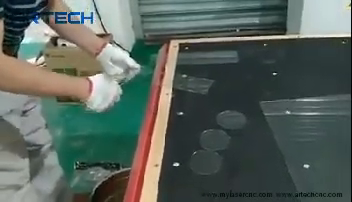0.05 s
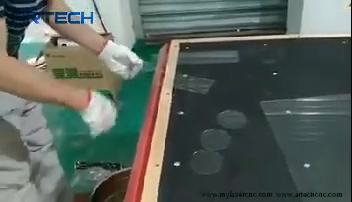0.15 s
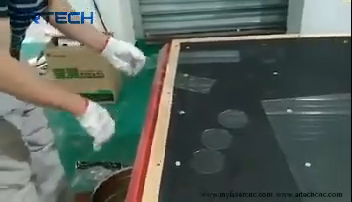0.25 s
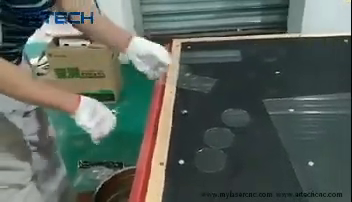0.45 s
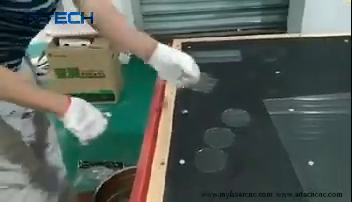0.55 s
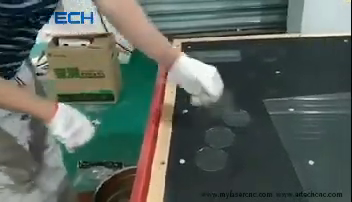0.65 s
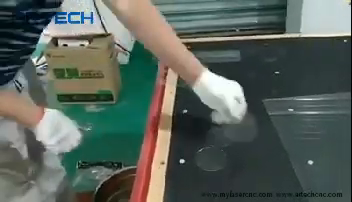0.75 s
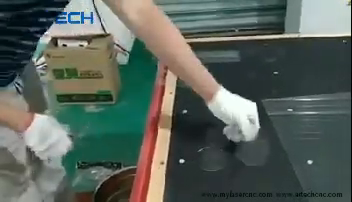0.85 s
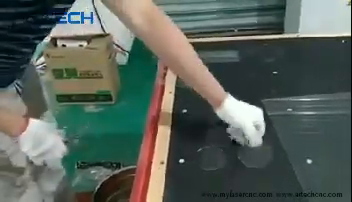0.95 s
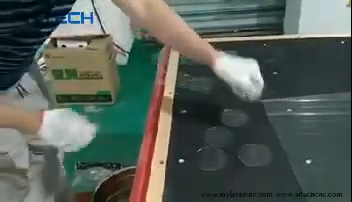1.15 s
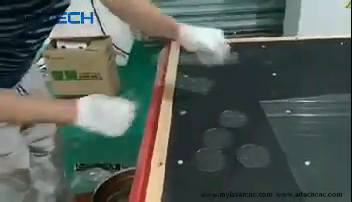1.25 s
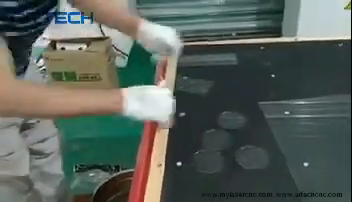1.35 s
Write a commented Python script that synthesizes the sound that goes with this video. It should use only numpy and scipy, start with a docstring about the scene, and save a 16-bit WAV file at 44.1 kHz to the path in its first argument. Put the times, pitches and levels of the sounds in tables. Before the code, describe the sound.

Glass clatter: after quiet, low machinery hum, an offcut crashes among scraps at 0.21 seconds, with bright cracks, short rings and a slight low thump, clinking until about 0.36. The hall echo swells back as the level recovers, then fades. At 0.69 a glass disc knocks on a padded table, quickly damped, with a faint tick at 0.84. Soft glove and sleeve rustle rises from 0.9.

```python
"""A glass offcut crashes among scraps in a large, echoing workshop: noise cracks, short modal rings, a bin thump.
A glass disc then knocks on the padded table and ticks once more: rim tick, table thud, modes soon stopped.
Sleeves and gloves rustle (rising noise); machinery hums far off (swelling noise, wavering sines).
The hall is a decaying noise tail. Gain control ducks at the crash and lets the ring swell back."""
import sys
import numpy as np
from scipy import signal
from scipy.fft import rfft, irfft, next_fast_len
from scipy.io import wavfile
from scipy.ndimage import minimum_filter1d

SR = 44100
rng = np.random.default_rng(int(sys.argv[2]) if len(sys.argv) > 2 else 0)


def unload_audio(sound):
    """Save the sound as a 16-bit wav file, at the path given as the first command line argument."""
    columns = np.transpose(np.atleast_2d(sound))
    # keep every value between -1 and 1, then stretch to whole-number steps
    steps = np.round(np.clip(columns, -1, 1) * 32767)
    wavfile.write(sys.argv[1], SR, steps.astype(np.int16))


N = 61739
T = np.arange(N) / SR
SIZE = next_fast_len(N, True)
FREQS = np.arange(SIZE // 2 + 1) * SR / SIZE


def from_db(db):
    """Decibels to amplitude gain."""
    return 10 ** (np.asarray(db) / 20)


def rms_one(x):
    """Scale to unit rms."""
    return x / np.sqrt(np.mean(x ** 2) + 1e-20)


def at_hz(points, hz):
    """Interpolate a (hz, value) table on a log-frequency axis."""
    point_hz, value = np.transpose(points)
    return np.interp(np.log(np.maximum(hz, 1)), np.log(point_hz), value)


def noise(spectrum):
    """White noise shaped by a spectrum, scaled to unit rms."""
    white = rfft(rng.standard_normal(SIZE))
    shaped = white * from_db(at_hz(spectrum, FREQS))
    return rms_one(irfft(shaped, SIZE)[:N])


def decay(age_s, t60_s):
    """Exponential decay by 60 dB in t60."""
    return np.exp(-np.log(1000) * age_s / t60_s)


def fade(start_s, t60_s):
    """Silence until the start, then an exponential decay."""
    return (T >= start_s) * decay(np.maximum(T - start_s, 0), t60_s)


def ring(modes, start_s):
    """One blow starts every mode as a decaying sine of random sign."""
    age_s = T[:SR // 3]
    out = 0
    for pitch_hz, level_db, t60_s in modes:
        gain = rng.choice([-1, 1]) * from_db(level_db)
        out = out + gain * np.sin(2 * np.pi * pitch_hz * age_s) * decay(age_s, t60_s)
    return np.pad(out, (int(start_s * SR), N))[:N]


HALL_GAP_S, HALL_BUILD_S = 0.0021, 0.006  # build-up is a time constant
# hall reverberation: pitch_hz, t60_s, relative level_db
HALL_BANDS = [(295, 0.73, 0.5), (1190, 1.1, 3.5), (1900, 1.8, -3.5), (2700, 1.32, 5), (4860, 1.09, 0),
              (7200, 1.0, 2), (9600, 0.81, 5), (14400, 0.5, 1)]


def hall(x):
    """Diffuse echoes: noise bands, each with its own decay, build up after a short gap."""
    white = rfft(rng.standard_normal(2 * N))
    hz = np.arange(N + 1) * SR / (2 * N)
    edges_hz = np.geomspace(100, 18000, 25)
    table = np.array(HALL_BANDS)
    tail = 0
    for low_hz, high_hz in zip(edges_hz, edges_hz[1:]):
        center_hz = np.sqrt(low_hz * high_hz)
        t60_s = at_hz(table[:, :2], center_hz)
        level_db = at_hz(table[:, ::2], center_hz)
        band = irfft(white * (hz >= low_hz) * (hz < high_hz))[:N]
        tail = tail + from_db(level_db) * band * fade(0, t60_s)
    tail = tail * (1 - np.exp(-np.maximum(T - HALL_GAP_S, 0) / HALL_BUILD_S))
    return signal.fftconvolve(x, rms_one(tail) / np.sqrt(N))[:N]


MACHINERY_START_DB, MACHINERY_SWELL_DB_PER_S = -45.5, 1
HUM_WAVER_RMS_DB, HUM_WAVER_HZ = 2.5, 4.5
# far machinery and ventilation spectrum: pitch_hz, relative level_db (per Hz)
MACHINERY_SPECTRUM = [(20, -3), (45, 5), (70, 0.5), (125, -2), (190, -6.5), (300, -11), (550, -16),
                      (1000, -10.5), (2000, -8.5), (3200, -12.5), (4400, -26), (5500, -28.5), (7700, -20),
                      (8700, -39.5), (14000, -33), (16000, -53)]
# motor hum before waver: pitch_hz, level_db (rms)
HUM_TONES = [(47, -53), (129.5, -58.5)]


def workshop():
    """Machinery is a slowly swelling noise; motor hum is sines with wavering level."""
    level_db = MACHINERY_START_DB + MACHINERY_SWELL_DB_PER_S * T
    out = from_db(level_db) * noise(MACHINERY_SPECTRUM)
    waver_spectrum = [(HUM_WAVER_HZ, 0), (4 * HUM_WAVER_HZ, -40), (100 * HUM_WAVER_HZ, -140)]
    for pitch_hz, level_db in HUM_TONES:
        waver_db = HUM_WAVER_RMS_DB * noise(waver_spectrum)
        tone = np.sin(2 * np.pi * (pitch_hz * T + rng.random()))
        out = out + np.sqrt(2) * from_db(level_db + waver_db) * tone
    return out


RUSTLE_DB, RUSTLE_START_S, RUSTLE_RISE_S = -54.5, 0.91, 0.21
# gloves and sleeves brush as the arm draws back: pitch_hz, relative level_db (per Hz)
RUSTLE_SPECTRUM = [(200, 10), (600, 9.5), (1500, -1), (4000, -9), (9000, -8), (15000, -17)]


def cloth():
    """Brushing cloth is faint noise that rises linearly, then stays."""
    rise = np.clip((T - RUSTLE_START_S) / RUSTLE_RISE_S, 0, 1)
    return from_db(RUSTLE_DB) * rise * noise(RUSTLE_SPECTRUM)


DISC_RING_DB, TICK_DB, THUD_DB = -18.5, -24.5, -30
TICK_T60_S, THUD_T60_S = 0.021, 0.058
DISC_FREE_S, DISC_STOP_S = 0.0051, 0.0021  # free ringing, then damping time constant
RING_ROOM_DB, TICK_ROOM_DB, THUD_ROOM_DB = -4.5, -4.5, -1.5
# disc contacts on the table: start_s, relative tick_db, ring_db, thud_db
DISC_KNOCKS = [(0.687, 1.5, -2, 2), (0.698, -9, -20, -19), (0.8390, -6.5, -27, -18)]
# disc modes: pitch_hz
DISC_PITCHES = [2560, 2690, 6055, 7850, 10300, 12450, 13560]
# same modes before pad damping: relative level_db, t60_s
DISC_DECAYS = [(1, 0.085), (-4.5, .08), (-1.5, 0.026), (-20, 0.012), (-11.5, 0.017), (-7, 0.006),
               (-9, 0.018)]
# rim tick spectrum: pitch_hz, relative level_db (per Hz)
TICK_SPECTRUM = [(1000, -5), (2000, 5), (2800, 6), (3600, -27), (4400, -1), (4950, 4.5), (5500, -2.5),
                 (6800, -6), (7800, 8), (8800, -23), (10300, -18), (15000, -12)]
# table top thud spectrum: pitch_hz, relative level_db (per Hz)
THUD_SPECTRUM = [(150, -36), (280, -34), (370, 9), (550, 0.5), (800, 0.5), (1300, -3), (2000, -2.5),
                 (3500, -29), (8000, -16.5)]


def disc():
    """The rim ticks and the table thuds as noise bursts; the pad soon stops the disc's modes."""
    glass, rim, table = 0, 0, 0
    tick, thud = noise(TICK_SPECTRUM), noise(THUD_SPECTRUM)
    modes = [(pitch_hz, level_db, t60_s)
             for pitch_hz, (level_db, t60_s) in zip(DISC_PITCHES, DISC_DECAYS)]
    for start_s, tick_db, ring_db, thud_db in DISC_KNOCKS:
        damping = np.exp(-np.maximum(T - start_s - DISC_FREE_S, 0) / DISC_STOP_S)
        glass = glass + from_db(DISC_RING_DB + ring_db) * ring(modes, start_s) * damping
        rim = rim + from_db(TICK_DB + tick_db) * tick * fade(start_s, TICK_T60_S)
        table = table + from_db(THUD_DB + thud_db) * thud * fade(start_s, THUD_T60_S)
    hall_send = from_db(RING_ROOM_DB) * glass
    hall_send = hall_send + from_db(TICK_ROOM_DB) * rim
    hall_send = hall_send + from_db(THUD_ROOM_DB) * table
    return glass + rim + table + hall(hall_send)


SCRAP_T60_S, SCRAP_DETUNE = 0.053, 0.0064  # detune: standard deviation as a fraction of pitch
# scrap modes before detuning: pitch_hz
SCRAP_PITCHES = [2110, 2270, 2315, 2560, 2710, 2945, 3120, 3460, 5370, 5749, 6223, 6751, 6864, 7040, 7500]
# same modes before level spread: relative level_db
SCRAP_LEVELS = [-12.5, -1.5, -4.5, -46, -6.5, -9, -14, -7, -8.5, -8, -12.5, -8, -12, -4, -7]


def clink(start_s, spread_db):
    """Each contact meets slightly different pieces, so pitches and strengths vary."""
    modes = []
    for pitch_hz, level_db in zip(SCRAP_PITCHES, SCRAP_LEVELS):
        varied_hz = pitch_hz * (1 + SCRAP_DETUNE * rng.normal())
        varied_db = level_db + spread_db * rng.normal()
        modes.append((varied_hz, varied_db, SCRAP_T60_S))
    return ring(modes, start_s)


SCRAP_RING_DB, CRACK_DB, CRACK_T60_S, SCRAP_ROOM_DB = -18, -13, 0.038, 1
BIN_START_S = 0.212
# offcut contacts: start_s, relative level_db
SCRAP_CONTACTS = [(0.2084, -11.5), (0.2094, -13), (0.2109, -1), (0.2132, -5), (0.2200, -8.5), (0.2410, -10),
                  (0.2595, -7.5), (0.2955, -12.5), (0.3190, -10.5), (0.3560, -11)]
# glass edge on glass, crack spectrum: pitch_hz, relative level_db (per Hz)
CRACK_SPECTRUM = [(300, -52), (1200, -31), (1700, -4.5), (2280, 5.5), (3100, 2), (4100, -3), (5000, -4),
                  (5600, 1), (7900, 0), (8500, -11), (9800, -3), (11800, -7), (13500, 2.5), (15700, -3.5)]
# scrap bin thump: pitch_hz, level_db, t60_s
BIN_THUMP = [(55.5, -23.5, 0.055)]


def scraps():
    """Each contact is a noise crack and a short modal ring; the bin thumps at one low mode."""
    power = sum((from_db(level_db) * fade(start_s, CRACK_T60_S)) ** 2
                for start_s, level_db in SCRAP_CONTACTS)
    cracks = noise(CRACK_SPECTRUM) * np.sqrt(power)
    rings = sum(from_db(level_db) * clink(start_s, spread_db=2.0)
                for start_s, level_db in SCRAP_CONTACTS)
    direct = from_db(CRACK_DB) * cracks + from_db(SCRAP_RING_DB) * rings
    echoes = from_db(SCRAP_ROOM_DB) * hall(direct)
    return direct + echoes + ring(BIN_THUMP, BIN_START_S)


def scene():
    """Scraps, disc, cloth and workshop sum at one microphone."""
    return (scraps() + disc() + cloth() + workshop())[None]


LIMIT_DB, RELEASE_DB_PER_S, CUTOFF_HZ = -21.5, 115, 15700
DETECT_S, ATTACK_S, HOLD_S = 0.0049, 0.00059, 0.066  # detect and attack are time constants


def record(dry):
    """Gain control ducks fast, holds and recovers at a steady dB rate; a low-pass cuts the top."""
    detect_pole = np.exp(-1 / (DETECT_S * SR))
    attack_pole = np.exp(-1 / (ATTACK_S * SR))
    power = signal.lfilter([1 - detect_pole], [1, -detect_pole], dry[0] ** 2)
    level_db = 10 * np.log10(power + 1e-12)
    over_db = np.maximum(level_db - LIMIT_DB, 0)
    half = int(HOLD_S * SR / 2)
    # trailing maximum holds each peak
    held_db = -minimum_filter1d(-over_db, 2 * half + 1, origin=half, mode="nearest")
    release_db = RELEASE_DB_PER_S * T
    duck_db = np.maximum.accumulate(held_db + release_db) - release_db
    smooth_duck_db = signal.lfilter([1 - attack_pole], [1, -attack_pole], duck_db)
    out = dry * from_db(-smooth_duck_db)
    low_pass = signal.ellip(10, .1, 70, CUTOFF_HZ, fs=SR, output="sos")
    return signal.sosfilt(low_pass, out)


dry = scene()
out = record(dry)
unload_audio(out)
```